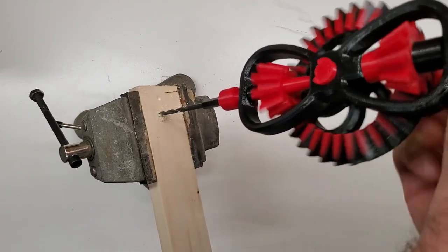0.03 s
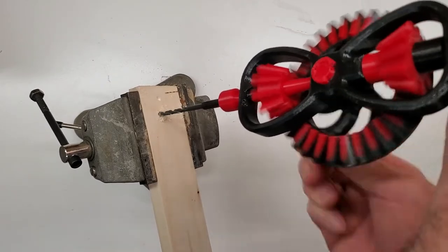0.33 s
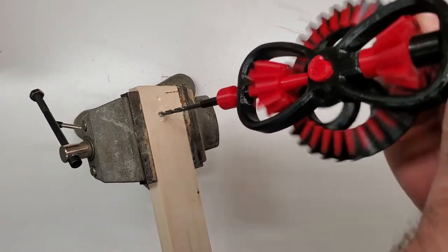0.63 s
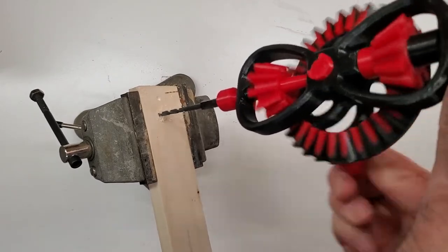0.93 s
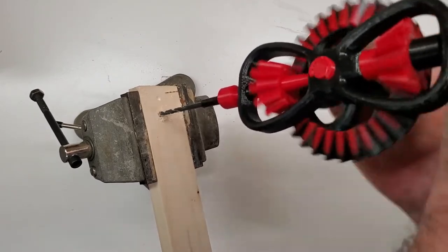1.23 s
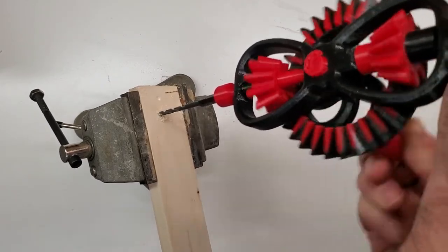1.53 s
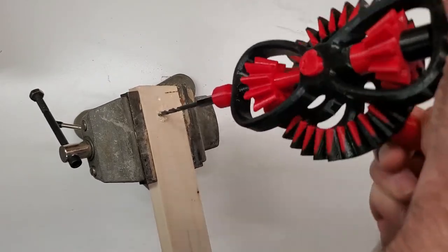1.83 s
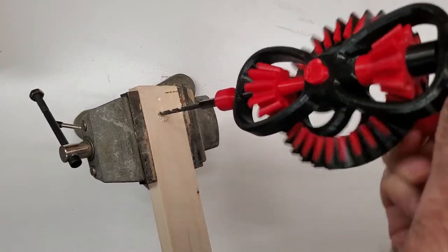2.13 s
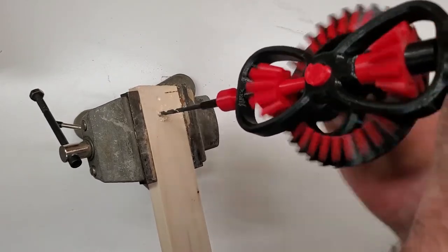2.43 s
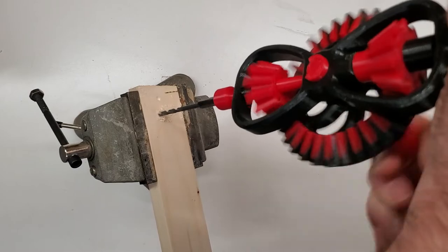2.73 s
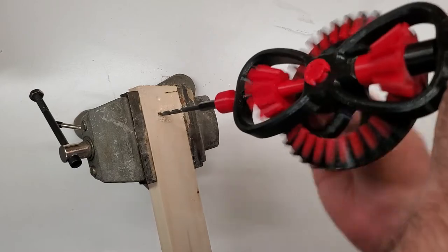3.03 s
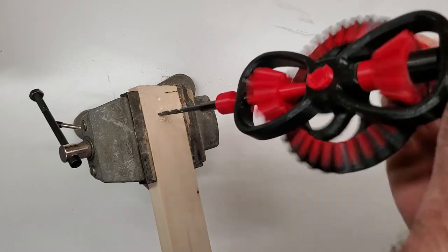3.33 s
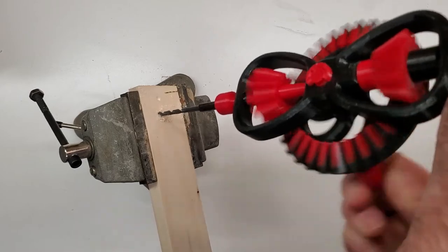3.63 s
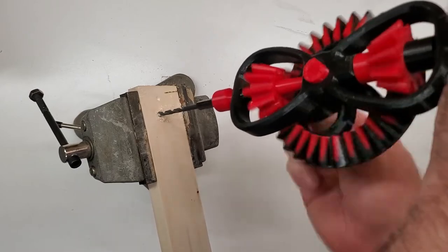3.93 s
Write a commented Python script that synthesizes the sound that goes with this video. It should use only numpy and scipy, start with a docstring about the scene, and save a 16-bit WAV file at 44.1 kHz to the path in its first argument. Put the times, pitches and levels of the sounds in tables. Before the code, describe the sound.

A hand-cranked drill's plastic gears grind and rattle, boring into wood with one brief pause.

```python
"""A hand-cranked drill with plastic gears bores into a board held in a vice, close by in a small workshop.
At first the teeth mesh nearly eighty times a second, scraping and now and then snapping over; they ring
the plastic frame while board and bench rumble along. Near 1.7 s the crank all but rests for half a second,
with one small creak. It starts again with a bump, and near 2.7 s the drill jolts against the wood,
then bores on a little faster than before. The room hums faintly throughout."""
import sys
import numpy as np
from scipy import signal
from scipy.fft import rfft, irfft
from scipy.io import wavfile
from scipy.ndimage import uniform_filter1d

SR = 44100
rng = np.random.default_rng(int(sys.argv[2]) if len(sys.argv) > 2 else 0)


def output_pcm(signal):
    """Save a mono or channel-first signal as 16-bit PCM at the path in sys.argv[1].

    Samples are clipped to [-1, 1] before scaling.
    """
    pcm = np.clip(np.atleast_2d(signal).T, -1, 1) * 32767
    wavfile.write(sys.argv[1], SR, np.round(pcm).astype(np.int16))


N = 176400
T = np.arange(N) / SR
GEAR_CORRELATION = 0.16   # between left and right
OPPOSITE_PHASE = np.array([[1], [-1]])
# resonances of the plastic frame and wheel: (frequency [Hz], bandwidth [Hz], lift [dB])
FRAME_RESONANCES = [(1082, 140, 4.5), (1217, 137, 4.5), (1342, 57, 13.5), (1440, 75, -3.5), (1685, 86, 2),
                    (2544, 120, 4), (3716, 130, 4), (4870, 220, 5), (9760, 140, 7.5)]


def tooth_impacts(jitter_periods=.2, spread_db=4):
    """Gear meshing: each passing tooth gives one impulse, uneven in time and strength."""
    # speed of the gears: (time [s], meshing rate [teeth/s])
    mesh_rate = [(0, 77.6), (1.5, 71.7), (1.75, 35.3), (2.15, 35), (2.45, 70), (2.75, 87.2), (4, 86.1)]
    teeth_passed = np.cumsum(in_time(mesh_rate)) / SR
    timing, strength = rng.standard_normal((400, 2))[:int(teeth_passed[-1])].T
    times = np.interp(np.arange(len(timing)) + jitter_periods * timing, teeth_passed, T)
    return impulses(times, from_db(spread_db * np.clip(strength, -2, 1.6)))


def gears(impacts):
    """Source and filter: friction and snapping teeth excite the resonances of the plastic frame."""
    # spectrum of the rattle: (frequency [Hz], spectral level [dB])
    rattle_spectrum = [(300, -14), (550, -7.5), (800, -3), (1100, 2), (1400, 0), (1800, -1), (2600, -3),
                       (3800, -3), (4400, -13.5), (7500, -23), (10000, -39), (16000, -42)]
    # spectrum of a snapping tooth: (frequency [Hz], spectral level [dB])
    snap_spectrum = [(300, -16), (700, -4.5), (1200, -0.5), (2300, 3), (3700, 0), (4600, -6), (7000, -16),
                     (10000, -21), (16000, -32)]
    # spectrum of bright scraping and cracking: (frequency [Hz], spectral level [dB])
    scrape_spectrum = [(2000, -55), (5000, -6.5), (7600, -9.5), (8300, 3), (9200, 0.5), (10800, 3),
                       (12500, -4.5), (15400, -9), (16000, -24)]
    snap, crack = snapping_teeth()
    rattle_gain, scrape_gain = strain()
    rattle = rattle_gain * moving_contact(friction(impacts))
    scrape = from_db(1) * scrape_gain * moving_contact(friction(impacts))
    return gear_balance(colour(rattle, rattle_spectrum, FRAME_RESONANCES)
                        + colour(snap, snap_spectrum, FRAME_RESONANCES)
                        + colour(scrape + crack, scrape_spectrum, FRAME_RESONANCES))


def friction(impacts, spots_per_s=380, grain_db=-2, slide_db=-2):
    """Impact and sliding friction: each tooth lands with a crunch, then slides over tiny rough spots."""
    landing = unit_rms(decay(impacts, decay_s=.0052) * noise(GEAR_CORRELATION))
    rough_spots = rng.random(N) < spots_per_s / SR
    grains = unit_rms(decay(rough_spots, decay_s=.0006) * noise(GEAR_CORRELATION))
    sliding = noise(GEAR_CORRELATION)
    return unit_rms(landing + from_db(grain_db) * grains + from_db(slide_db) * sliding)


def moving_contact(x, depth_db=3, changes_per_s=45):
    """Amplitude modulation: as the contact point moves, each band swells and fades by itself."""
    octave = np.log2(np.arange(N // 2 + 1) * SR / N + 1)
    centres = np.linspace(np.log2(700), np.log2(15000), 11)
    spectrum = rfft(x)
    modulated = 0
    for weights in np.eye(len(centres)):
        band = irfft(spectrum * np.interp(octave, centres, weights), N)
        knots = rng.standard_normal(2000)
        wander = unit_rms(np.interp(T * changes_per_s, np.arange(len(knots)), knots))
        modulated += band * from_db(depth_db * wander)
    return unit_rms(modulated)


def strain(steady_scrape_db=-10.5):
    """Power addition: the steady load and each bite of the bit set the gains of rattle and scrape."""
    # rattle of the gears under steady load: (time [s], level [dB])
    load = [(0, -49.5), (0.19, -54.5), (0.51, -55), (0.72, -55), (1.1, -51), (1.16, -62.5), (1.2, -51),
            (1.36, -55), (1.53, -53.5), (1.64, -58.5), (1.74, -74.5), (2.16, -79.5), (2.19, -63.5),
            (2.29, -66), (2.34, -58.5), (2.56, -55), (2.85, -51), (2.95, -57.5), (3.1, -52), (3.29, -58),
            (3.4, -53), (3.52, -55), (3.58, -50.5), (3.82, -55), (4, -45)]
    # the bit bites and the gears grind: (time [s], duration [s], rattle level [dB], scrape level [dB])
    bites = [(0.029, 0.062, -48.5, -56), (0.53, 0.026, -51, -57), (0.621, 0.073, -55.5, -63),
             (0.748, 0.057, -55.5, -59.5), (1, 0.038, -51.5, -56.5), (1.051, 0.039, -46.5, -53.5),
             (1.264, 0.02, -49.5, -70), (1.405, 0.035, -48.5, -56), (2.479, 0.041, -49, -60.5),
             (2.602, 0.07, -50.5, -65), (2.714, 0.053, -48.5, -59.5), (2.783, 0.065, -47.5, -66),
             (2.989, 0.036, -52.5, -60.5), (3.12, 0.065, -50, -58.5), (3.346, 0.019, -44.5, -54.5),
             (3.455, 0.041, -51.5, -61.5), (3.67, 0.039, -50, -65), (3.728, 0.039, -43, -52.5)]
    load_db = in_time(load)
    power = from_db([load_db, load_db + steady_scrape_db]) ** 2
    for start_s, length_s, rattle_db, scrape_db in bites:
        power += (from_db([[rattle_db], [scrape_db]]) * held(start_s, length_s)) ** 2
    return np.sqrt(power)


def snapping_teeth():
    """Elastic release: a caught tooth snaps over, giving a noise burst and a shorter one for the treble."""
    # teeth snapping over: (time [s], relative level [dB], treble offset [dB])
    snaps = [(0.0353, -33, -14), (0.1036, -43, -10), (0.255, -39, -14), (0.308, -51, 0), (0.3818, -39, -12),
             (0.4345, -39, -29), (0.5313, -40, -10), (0.55, -39, -25), (0.6155, -50, -3),
             (0.8038, -34.5, -20), (0.8577, -37, -28), (0.9164, -36, -7.5), (0.9909, -40.5, -6.5),
             (1.042, -37.5, -17), (1.067, -33, -28), (1.076, -40, -24), (1.1795, -43, -11),
             (1.2184, -41.5, -4), (1.39, -43.5, -9.5), (1.488, -39.5, -10.5), (1.523, -45.5, -8),
             (2.2141, -45.5, -18), (2.2341, -44.5, -15), (2.336, -50.5, -12.5), (2.5577, -41, -14),
             (2.584, -33.5, -24), (2.6106, -31, -20), (2.6446, -32, -22), (2.7258, -36, -28),
             (2.7607, -35, -11), (2.7911, -36.5, -31), (2.8595, -43, -32), (3.0755, -36, -19),
             (3.147, -37, -16), (3.352, -37, -21), (3.4516, -50, -19), (3.485, -44.5, -19),
             (3.598, -34.5, -5.5), (3.6722, -41.5, -17), (3.7146, -38.5, -4.5), (3.7244, -34, -17),
             (3.8593, -40, -13.5)]
    times, db, treble_db = np.transpose(snaps)
    snap = bursts(times, db - 2.5, decay_s=.0034)
    crack = bursts(times, db + treble_db + 6, decay_s=.0019) * pan(1)
    return snap, crack


def frame_bumps():
    """Impact excitation: the wheel bumps the hollow frame, which rings briefly."""
    # bumps of the wheel: (time [s], level [dB])
    bumps = [(0.082, -45), (0.614, -42.5), (0.803, -48), (1.082, -45.5), (1.544, -49), (1.618, -46.5),
             (2.213, -47), (2.734, -39.5), (3.354, -45)]
    # response of the hollow frame: (frequency [Hz], spectral level [dB])
    hollow_spectrum = [(600, -23), (1050, -3.5), (1350, -4.5), (1700, -7.5), (2600, -30)]
    times, db = np.transpose(bumps)
    return gear_balance(colour(bursts(times, db, decay_s=.011), hollow_spectrum, FRAME_RESONANCES))


def wheel_rub(ring_hz=3770, width_hz=190):
    """Frictional excitation: the slowly turning wheel drives one narrow resonance of the frame."""
    # rubs of the wheel: (time [s], duration [s], level [dB])
    rubs = [(1.62, .17, -74), (2.325, .11, -63.5)]
    band = signal.butter(1, [ring_hz - width_hz / 2, ring_hz + width_hz / 2], "band", fs=SR, output="sos")
    ring = unit_rms(signal.sosfilt(band, noise(GEAR_CORRELATION)))
    return ring * sum(from_db(db) * held(start_s, length_s) for start_s, length_s, db in rubs)


def creak(half_width_s=.0037):
    """Stick-slip: the resting gears slip once, sounding a tone under a Gaussian envelope."""
    # slip of the gears: (time [s], frequency [Hz], level [dB])
    slips = [(1.908, 1128, -53.5)]
    return sum(from_db(db) * np.exp(-((T - time_s) / half_width_s) ** 2) * np.sin(2 * np.pi * hz * T)
               for time_s, hz, db in slips)


def gear_balance(x):
    """Interchannel level difference: each frequency of the gears leans to its own side."""
    # stereo balance of the gears: (frequency [Hz], left minus right [dB])
    balance = [(500, 2.5), (1000, 1.5), (1400, 0.5), (2000, 2.5), (2800, 1), (3700, -1.5), (5000, 9),
               (12000, 3.5)]
    hz, db = np.transpose(balance)
    bin_hz = np.arange(N + 1) * SR / (2 * N) + 1
    lean_db = np.interp(np.log(bin_hz), np.log(hz), db)
    return irfft(rfft(x, 2 * N) * pan(lean_db))[:, :N]


def boring(impacts, cutting_db=1.5, thud_db=-3.5):
    """Forced vibration: the cutting bit and the thud of each tooth shake board and bench."""
    # shaking of board and bench: (time [s], level [dB])
    shaking = [(0, -55.5), (1.02, -55.5), (1.09, -47), (1.14, -54.5), (1.6, -57.5), (1.72, -71),
               (2.15, -87), (2.19, -61), (2.65, -53.5), (2.7, -46.5), (2.88, -53), (3.28, -54.5),
               (3.36, -53.5), (3.45, -56.5), (3.7, -53.5), (3.75, -47), (3.82, -56), (4, -50)]
    # response of board and bench: (frequency [Hz], spectral level [dB])
    rumble_spectrum = [(25, -35), (42, -1.5), (80, 2), (120, -2.5), (170, 1.5), (210, -2.5), (265, 4.5),
                       (320, -10), (420, -10.5), (560, -24), (1200, -58)]
    thuds = unit_rms(colour(impacts, rumble_spectrum))
    cutting = colour(rng.standard_normal(N), rumble_spectrum)
    return from_db(in_time(shaking)) * (from_db(cutting_db) * cutting + from_db(thud_db) * thuds)


def board_knocks():
    """Modal ringing: the drill knocks on board and bench; the longer the contact, the duller the knock."""
    # knocks of the drill: (time [s], impulse level [dB], contact time [s])
    knocks = [(1.087, -36, 0.0047), (2.221, -28.5, 0.0091), (2.594, -38, 0.0018), (2.681, -19.5, 0.0038),
              (2.694, -39, 0.0044), (2.741, -26, 0.0059), (2.789, -32, 0.0046)]
    # modes of board and bench: (frequency [Hz], gain [dB], time to fall 60 dB [s])
    modes = [(49, -16, 0.35), (85.8, -4, .14), (167, -4, 0.084), (266, -6.5, 0.07), (397, -22, 0.068)]
    force = np.zeros(N)
    for start_s, db, contact_s in knocks:
        pulse = np.sin(np.pi * np.clip((T - start_s) / contact_s, 0, 1)) ** 2
        force += from_db(db) * pulse / pulse.sum()
    ringing = 0
    for hz, db, t60_s in modes:
        radius, angle = from_db(-60 / (t60_s * SR)), 2 * np.pi * hz / SR
        feedback = [1, -2 * radius * np.cos(angle), radius ** 2]
        ringing += from_db(db) * signal.lfilter([.5, 0, -.5], feedback, force + 1e-18)
    return ringing * pan(-1.5)


def diffuse_rumble(bench, relative_db=-14, window_s=.04):
    """Decorrelation: a diffuse rumble follows the level of the bench and sets the channels apart."""
    # spectrum of the diffuse rumble: (frequency [Hz], spectral level [dB])
    diffuse_spectrum = [(25, -12), (50, 1), (110, 4.5), (200, -8.5), (350, -0.5), (800, -39)]
    power = uniform_filter1d(np.mean(bench ** 2, axis=0), int(window_s * SR) + 1)
    rumble = colour(rng.standard_normal(N), diffuse_spectrum)
    return from_db(relative_db) * np.sqrt(np.abs(power)) * rumble * OPPOSITE_PHASE


def reverberation(x, t60_s=.2, gap_s=.004, wall_hz=6900, relative_db=-9.5):
    """Diffuse reflection: the workshop returns a short, slightly dull tail, different on each side."""
    t = T[:SR // 2]
    tail = rng.standard_normal((2, len(t))) * np.exp(-np.log(1000) * t / t60_s) * (t > gap_s)
    tail = signal.sosfilt(signal.butter(1, wall_hz, fs=SR, output="sos"), tail)
    tail /= np.sqrt(np.sum(tail ** 2) / 2)
    return from_db(relative_db) * signal.fftconvolve(x, tail, axes=1)[:, :N]


def room_hum(level_db=-56.5):
    """Stationary background noise: a low hum, much alike in both channels."""
    # spectrum of the hum: (frequency [Hz], spectral level [dB])
    hum_spectrum = [(25, -28), (45, 2), (90, -2.5), (130, -6.5), (180, -19.5), (500, -28.5), (720, -25.5),
                    (1000, -27.5), (1400, -45.5), (2500, -47.5), (7000, -56.5), (16000, -49)]
    return from_db(level_db) * colour(noise(correlation=.72), hum_spectrum)


def from_db(db):
    """Amplitude ratio of a level in decibels."""
    return 10 ** (np.asarray(db) / 20)


def unit_rms(x):
    """Normalisation to unit mean power."""
    return x / np.sqrt(np.mean(x ** 2) + 1e-20)


def in_time(curve):
    """Linear interpolation of (time, value) rows at every sample."""
    return np.interp(T, *np.transpose(curve))


def pan(left_minus_right_db):
    """Constant-power panning: gains for left and right."""
    gains = from_db(np.array([[.5], [-.5]]) * left_minus_right_db)
    return gains / np.sqrt(np.mean(gains ** 2, axis=0))


def noise(correlation):
    """Partial coherence: white stereo noise mixed from a common and an opposed part."""
    mid, side = rng.standard_normal((2, N))
    return (np.sqrt(1 + correlation) * mid + np.sqrt(1 - correlation) * side * OPPOSITE_PHASE) / np.sqrt(2)


def colour(x, spectrum, resonances=()):
    """Minimum-phase filter of unit power gain: a broad spectrum with resonances on top."""
    size = 2 * N
    hz = np.arange(N + 1) * SR / size + 1
    point_hz, point_db = np.transpose(spectrum)
    db = np.interp(np.log(hz), np.log(point_hz), point_db)
    db += 20 * np.log10(np.minimum(hz / point_hz[0], 1))   # 6 dB per octave below the first point
    for centre_hz, width_hz, lift_db in resonances:
        db += lift_db / (1 + (2 * (hz - centre_hz) / width_hz) ** 2)
    cepstrum = irfft(np.log(unit_rms(from_db(db))))
    cepstrum[1:N] *= 2   # folding onto positive time makes the filter causal
    cepstrum[N + 1:] = 0
    return irfft(rfft(x, size) * np.exp(rfft(cepstrum)))[..., :N]


def impulses(times, sizes):
    """Ideal impacts, each one sample long."""
    train = np.zeros(N)
    np.add.at(train, np.clip((times * SR).astype(int), 0, N - 1), sizes)
    return train


def decay(x, decay_s):
    """Damping: each impulse dies away exponentially."""
    return signal.lfilter([1], [1, -np.exp(-1 / (decay_s * SR))], x + 1e-18)


def bursts(times, db, decay_s, attack_s=.0002):
    """Transients: noise that builds up in an instant, then decays exponentially."""
    falling = decay(impulses(times, from_db(db)), decay_s)
    envelope = decay(falling, attack_s) / (attack_s * SR)
    return envelope * noise(GEAR_CORRELATION)


def held(start_s, length_s, attack_s=.0018, release_s=.0091):
    """Envelope of a sustained contact: linear rise, hold, exponential release."""
    rise = np.clip((T - start_s) / attack_s, 0, 1)
    return rise * np.exp(-np.clip((T - start_s - length_s) / release_s, 0, 20))


def scene():
    """Superposition of the drill, its reverberation, the bench and the hum of the room."""
    impacts = tooth_impacts()
    drill = gears(impacts) + frame_bumps() + wheel_rub() + creak()
    bench = boring(impacts) + board_knocks()
    return drill + reverberation(drill) + bench + diffuse_rumble(bench) + room_hum()


def record(dry, low_cut_hz=20, high_cut_hz=16200):
    """Band limiting: the microphone loses the deepest bass, and the top is cut steeply."""
    thinned = signal.sosfilt(signal.butter(2, low_cut_hz, "high", fs=SR, output="sos"), dry)
    return signal.sosfilt(signal.ellip(10, .1, 80, high_cut_hz, fs=SR, output="sos"), thinned)


dry = scene()
out = record(dry)
output_pcm(out)
```